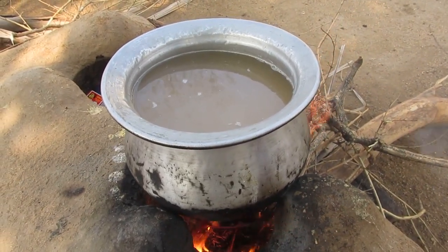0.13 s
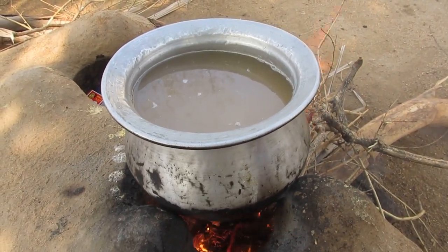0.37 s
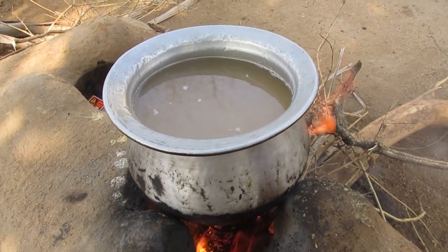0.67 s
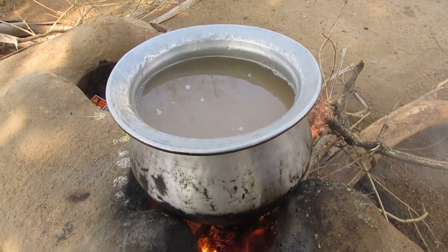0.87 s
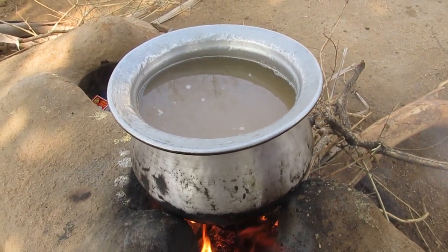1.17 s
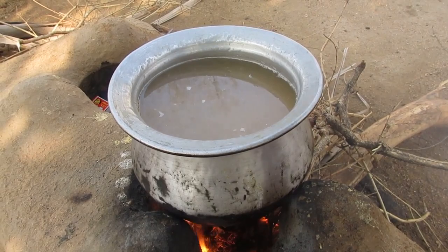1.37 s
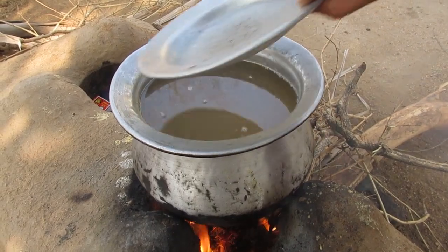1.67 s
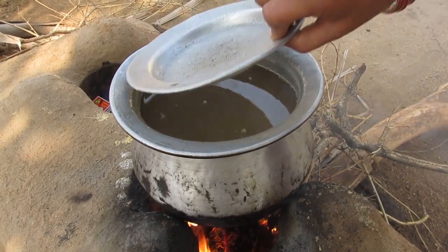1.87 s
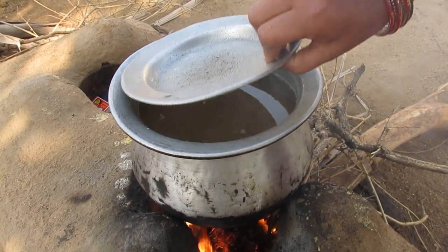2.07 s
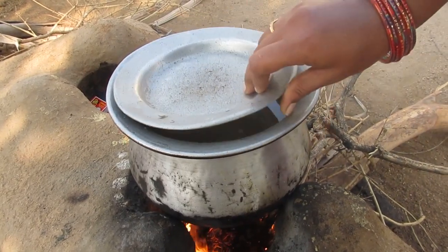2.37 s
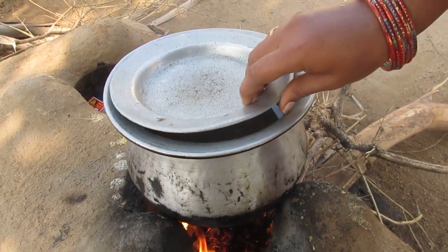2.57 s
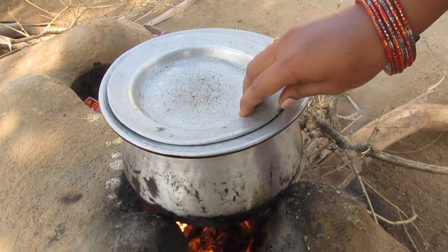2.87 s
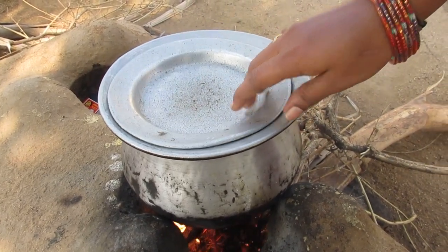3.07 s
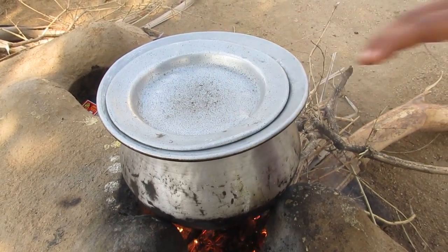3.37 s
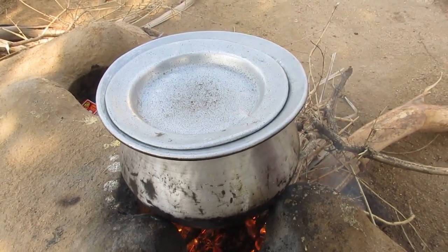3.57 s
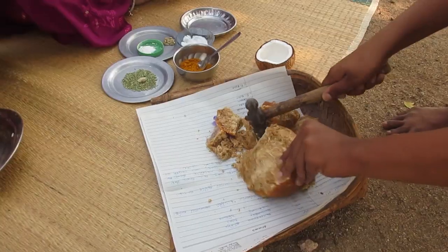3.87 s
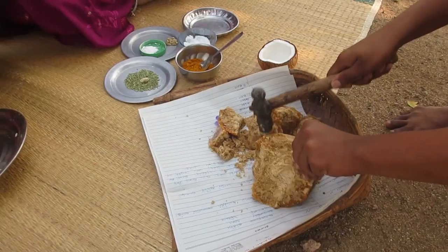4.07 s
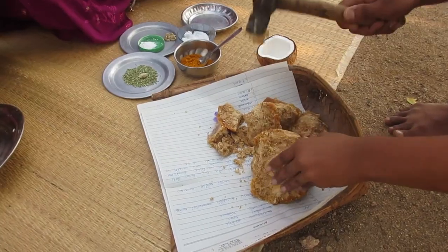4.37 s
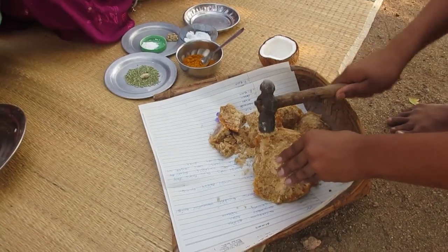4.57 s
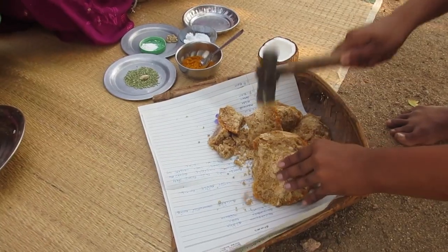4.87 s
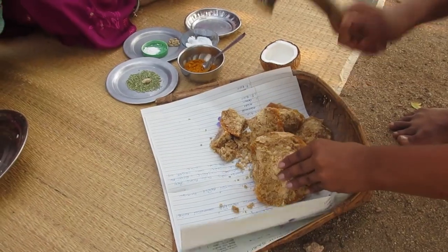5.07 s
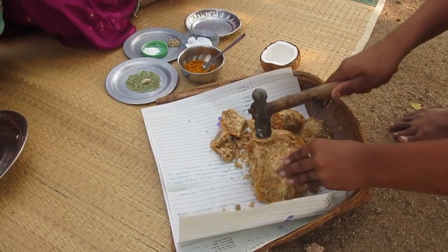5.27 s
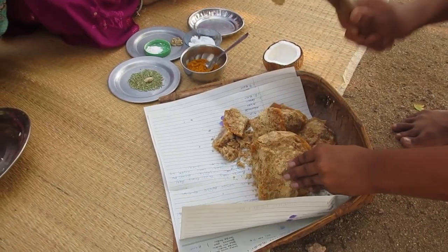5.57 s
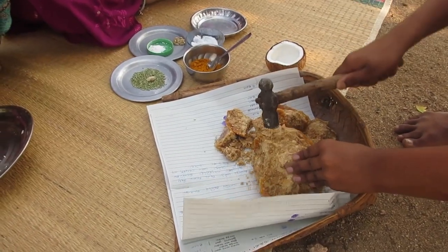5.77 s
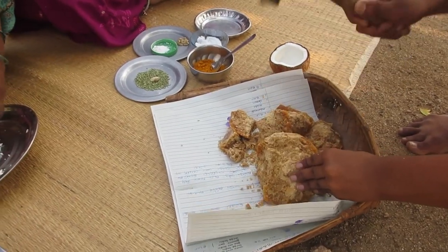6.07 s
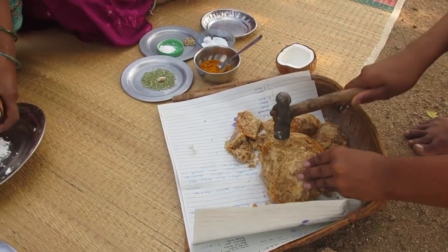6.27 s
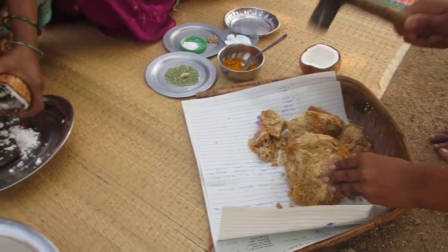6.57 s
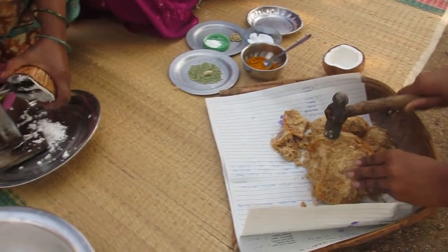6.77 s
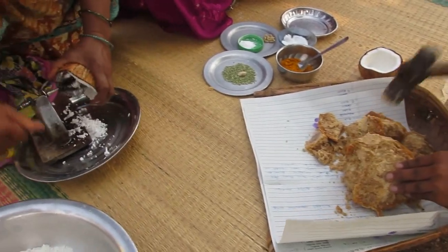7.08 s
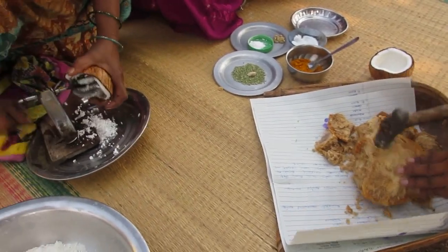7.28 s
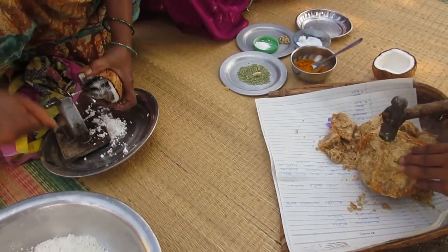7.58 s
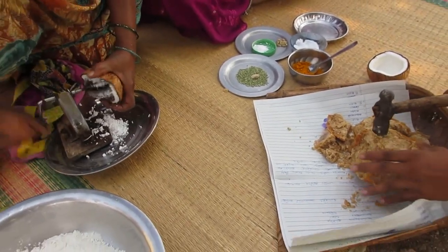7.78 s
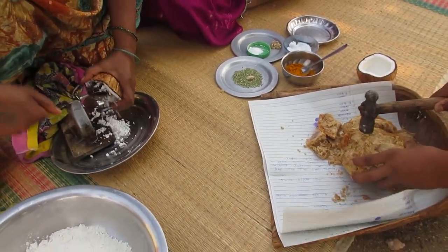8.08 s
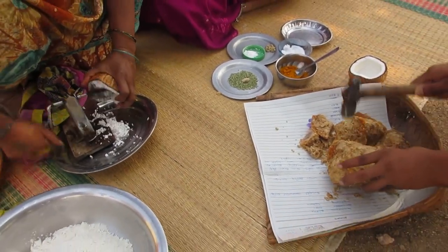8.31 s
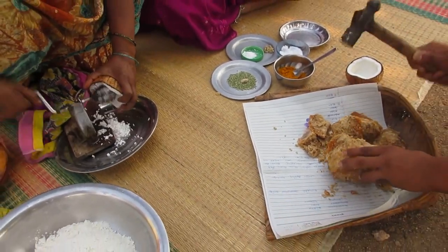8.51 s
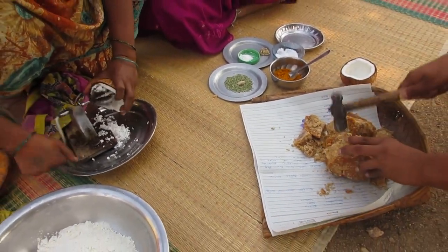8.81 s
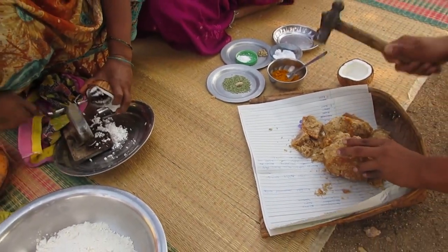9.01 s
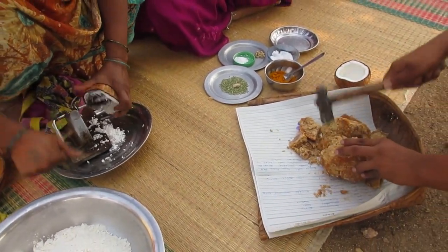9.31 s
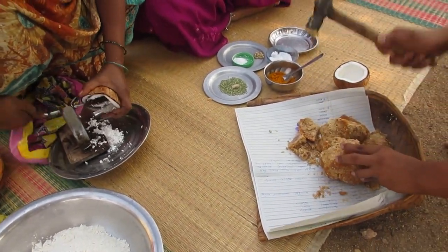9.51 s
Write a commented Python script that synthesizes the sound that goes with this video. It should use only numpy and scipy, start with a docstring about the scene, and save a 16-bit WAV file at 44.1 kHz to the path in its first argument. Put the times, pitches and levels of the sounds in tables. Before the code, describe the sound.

Outdoor wood fire snaps, bangles jingle and a metal lid clanks onto a pot; then hammer blows crunch a hard block beside rapid coconut grating.

```python
"""Fireside pot and jaggery breaking

At a crackling wood fire outdoors a bird whistles, bangles jingle, a twig knocks and a metal lid is
slid onto a pot. After a short silence a hammer breaks a block of jaggery on paper in a winnowing
basket, while coconut halves are grated on a toothed blade and the shell knocks on the steel.
Hits are decaying noise bursts and damped modes; rubbing and grating are grain noise under
stroke envelopes; the whistles are gliding sines; air and flame are coloured noise.
"""
import sys
import numpy as np
from scipy import signal
from scipy.fft import rfft, irfft, next_fast_len
from scipy.io import wavfile
from scipy.ndimage import uniform_filter1d

SR = 44100
rng = np.random.default_rng(int(sys.argv[2]) if len(sys.argv) > 2 else 0)


def output_pcm(signal):
    """Save a mono or channel-first signal as 16-bit PCM at the path in sys.argv[1].

    Samples are clipped to [-1, 1] before scaling.
    """
    pcm = np.clip(np.atleast_2d(signal).T, -1, 1) * 32767
    wavfile.write(sys.argv[1], SR, np.round(pcm).astype(np.int16))


N = 425565
T = np.arange(N) / SR
AGE = np.arange(SR // 3) / SR  # s since a hit

# All event and mode levels are relative: each source adds its own gains.
# Every *_COLOUR table is a spectrum: freq_hz, rel_db. Every *_MODES table: freq_hz, rel_db, t60_s.

# Hammer blows: start_s, knock_hz, knock_db, basket_thump_db, crunch_db, bright_crack_db
BLOWS = [(4.5771, 760, 1, -2, -2.5, -12.5), (5.1912, 863, 11, -4.5, -4, -18), (5.7086, 556, 5, -2, -2, -20),
         (6.2389, 1050, 9, -4, -6, -27), (6.7715, 1215, 9, -10, -3.5, -21),
         (7.3108, 1090, 1.5, -6.5, -9, -17), (8.6532, 593, -20, -4, -8, -16),
         (9.151, 520, -10, -4, -8, -13), (9.6440, 590, 1.5, -5.5, -6.5, -15.5)]
# Winnowing basket: freq_hz, rel_db, t60_s
BASKET_MODES = [(162, -25, 0.062), (206.6, 0, 0.037), (262.6, -6.5, 0.034), (378, -6, 0.0274),
                (481, -3, 0.024)]
# Crushed block: freq_hz, rel_db
CRUNCH_COLOUR = [(100, -23), (350, -1), (520, 2), (1300, -4), (1800, -4.5), (2600, -6), (4000, -8),
                 (6000, -18.5), (10000, -24), (15000, -35)]
CRACK_COLOUR = [(1500, -19), (3600, 10.5), (8000, -2.0), (15000, -10.5)]
SETTLE_COLOUR = [(90, 7.0), (250, 4), (800, -4.5), (3000, -6.5), (12000, -29)]

# Runs of even grating strokes: first_s, last_s, nominal_rate_per_s, first_db, last_db, drag_db (re strokes)
RUNS = [(6.53, 6.74, 14, -47, -34, -4), (6.811, 6.939, 16, -43, -41, -15),
        (7.049, 7.272, 18, -42, -38.5, -11), (7.34, 7.584, 16, -36, -35.5, -24),
        (7.654, 8.015, 17, -31.5, -35, -6.5), (8.154, 8.467, 20, -32, -34.5, -7),
        (8.504, 8.822, 16, -33.5, -31, -7), (8.883, 9.144, 23, -38.5, -35, -4.5),
        (9.259, 9.527, 15, -34, -32, -8)]
# Torn fibres: freq_hz, rel_db
GRATE_COLOUR = [(120, -18.5), (230, -1.5), (380, -16.5), (500, -6), (700, -17.5), (1050, -2), (1700, -9.5),
                (2450, 3), (3300, -3.5), (4300, -5), (5200, -15), (6300, -12), (7700, -19.5), (10700, -15),
                (15500, -37.5)]
TEETH_COLOUR = [(600, -27), (2000, 8), (6000, 4.5), (11000, 4), (15000, -15)]
STROKE_SCATTER_DB, STROKE_SLIP_S = 1.86, 0.004  # the hand is never quite even

# Shell knocks on the blade: start_s, low_clack_db, bright_clink_db
CLACKS = [(6.675, -28, -23.5), (7.098, -26, -40), (7.214, -37.5, -36.5), (7.416, -49, -28.5),
          (7.52, -25, -33.5), (7.638, -22.5, -33.5), (7.704, -20, -31.5), (7.811, -30, -26),
          (7.901, -23.5, -33), (7.949, -21, -24.5), (8.048, -6, -25.5), (8.316, -21.5, -32.5),
          (8.457, -19.5, -31), (8.483, -18.5, -19.5), (8.6, -14.5, -39), (8.609, -9, -20),
          (9.169, -34, -21.5), (9.413, -24, -16), (9.443, -18, -25.5), (9.599, -35, -19), (9.606, -26, -13)]
# Clack noise: freq_hz, rel_db
CLACK_COLOUR = [(120, -12), (400, 1), (650, 7.5), (1400, 7), (2600, 0), (4500, 3.5), (8000, -15.5),
                (15000, -20.5)]
STEEL_TICK_COLOUR = [(1500, -8), (4000, 0), (11000, -2), (15000, -8)]
# Hollow shell: freq_hz, rel_db, t60_s
SHELL_MODES = [(618, -10, 0.1), (887, 1.5, 0.11), (1085, -6, 0.051), (1550, 4, 0.049), (2070, 1.5, 0.081),
               (2580, 5.5, 0.063), (3560, 5, 0.038), (4300, -3, 0.039)]
# Steel blade: freq_hz, rel_db, t60_s
BLADE_MODES = [(3070, -35, 0.11), (6400, -42, .04), (5930, 12, 0.035), (6700, 10, 0.046),
               (8600, 3.5, 0.051), (10600, 4, 0.062), (12500, -1.5, .03)]

# Block pushed over the paper: start_s, length_s, grit_db, hiss_db
PUSHES = [(3.885, .015, -33.5, -60), (3.905, .05, -28, -40.5), (3.957, .01, -22.5, -41.5),
          (3.986, .036, -31, -33), (4.116, .008, -32, -38), (4.623, .54, -49.5, -65)]
# Gritty drag: freq_hz, rel_db
SHIFT_COLOUR = [(47, -39), (80, -17), (300, -8), (382, -15), (581, -2.5), (663, -13), (845, -8.5),
                (1790, -8), (3310, -6), (11100, -24), (15500, -28.5)]
HISS_COLOUR = [(2000, -10.5), (5000, 3.5), (9000, 7), (15000, -1.0)]
# Largest crumbs falling: start_s, level_db
CRUMBS = [(4.12, -22), (4.147, -26.5), (4.479, -31), (4.819, -16), (4.882, -26.5), (4.941, -26.5),
          (5.114, -22.5), (5.495, -32.5), (5.627, -32.5), (5.74, -23.5), (5.862, -31), (6.057, -28),
          (6.269, -31.5)]
# Crumbs and paper rustle: freq_hz, rel_db
CRUMB_COLOUR = [(150, -4), (700, 0.5), (2300, 5.5), (4500, 0.5), (9000, -6.5), (15000, -19.5)]
PUSH_ATTACK_S, PUSH_RELEASE_S = 0.0072, 0.019
RUSTLE_DB, RUSTLE_FALL_DB_PER_S = -49, 29.5
SMALL_CRUMB_DB, CRUMB_FLIGHT_MAX_S = -32, 0.47

# Lid meets rim: start_s, first_edge_db, opposite_edge_db, opposite_chatter_s (time to drop 20 dB)
LID_HITS = [(1.999, -12, -33, 0.018), (2.19, -23.5, -27, .09), (2.263, -20.5, -38, .02),
            (2.298, -21.5, -37, .02), (2.345, -9, -9, 0.014), (2.662, -10, -14.5, 0.039),
            (2.733, -8, -18, 0.032), (2.825, -9.5, -19, 0.017), (2.833, 4, -1, 0.066),
            (3.114, -4.5, -6.5, 0.068)]
# Lid and pot: freq_hz, rel_db, t60_s
LID_MODES = [(620, -7.5, 0.093), (694.3, -3.5, .12), (768, 6.5, 0.029), (851, -7, 0.06),
             (982, -33.5, 0.097), (1204, -4, 0.12), (1308, -5.5, 0.063), (1464, -20.5, 0.096),
             (1520, -4.5, 0.11), (1656, -3.5, 0.12), (1750, -14, .07), (2060, -13, 0.13),
             (2036, -13.5, 0.15), (2230, -0.5, 0.099), (2420, -8.5, 0.12), (2450, -7, 0.072),
             (2576, -11.5, 0.14), (3250, -12, .06), (3540, -19, .05), (3930, -17.5, 0.085),
             (4210, -6, 0.042), (4570, -18.5, .065)]
LID_TICK_COLOUR = [(200, -24.0), (700, 17.5), (2200, -4.0), (5000, -7), (10000, -18.0), (15000, -42)]
ROCK_S, FIRST_CHATTER_S = 0.016, 0.027  # opposite edge delay; first edge time to drop 20 dB
# Lid slides: middle_s, sigma_s, level_db
SLIDES = [(1.278, 0.073, -45.5), (1.873, 0.096, -47.5), (2.187, 0.042, -37), (2.479, 0.076, -36),
          (2.797, 0.049, -39)]
# Metal rub: freq_hz, rel_db
RUB_COLOUR = [(500, -20), (700, -28), (1400, 5), (2600, -2), (3500, -1.5), (4400, -0.5), (6000, -5.5),
              (10000, -8.5), (15000, -26)]
# Pot thuds on its stones: start_s, level_db
JOLTS = [(2.834, -10), (3.345, -40.5), (3.643, -27.5)]
JOLT_COLOUR = [(45, -10.5), (110, -2.5), (260, 5), (1000, -9), (5000, -11.5), (14000, -20.0)]

# Bangles touch: start_s, level_db
JINGLES = [(0.969, -35.5), (1.055, -38), (1.298, -7), (1.343, -16), (1.357, -20.5), (1.383, -23.5),
           (1.398, -24.5), (2.016, -29)]
# Glass bangle: freq_hz, rel_db, t60_s
BANGLE_MODES = [(6830, -9, 0.047), (7600, -2, 0.039), (7930, 0, 0.063), (8360, 3, 0.044), (8560, -5, 0.076),
                (8510, -13, 0.12), (8870, -3, 0.0506), (9630, -20, 0.124), (10700, -17.5, 0.13),
                (11300, -13, 0.12)]
REBOUND_MIN_S, REBOUND_LOSS_DB = 0.0068, 5  # bangles spring apart and touch again

# Twig knock and scuff by the fire: start_s, level_db
TWIG_KNOCKS = [(1.198, -34), (1.21, -25.5), (1.261, -43.5)]
TWIG_COLOUR = [(300, 6), (900, -26.0), (1450, -2.0), (2400, -5.0), (3500, -18.5), (9000, -26.5)]

# Snaps of burning wood, except 1.987 s, which is the lid touching the rim: start_s, level_db
SNAPS_AND_RIM_TOUCH = [(0.0214, -20), (0.265, -24.5), (0.4058, -25.5), (1.0994, -19.5), (1.2097, -14),
                       (1.5314, -26), (1.6211, -19), (1.987, -22.5), (2.054, -24.5), (2.387, -21),
                       (2.6356, -18.5), (3.052, -35), (3.6763, -33)]
SNAP_COLOUR = [(900, -6.5), (2200, 2), (5000, -2.0), (10000, -6.5), (15000, -17.0)]
FAINT_SNAP_DB = -37
# Flame flap: time_s, level_db
FLAME = [(.5, -72), (.57, -47), (.595, -45), (.615, -36), (.64, -46), (.68, -48)]
# Flame noise: freq_hz, rel_db
FLAME_COLOUR = [(50, -27), (150, -2), (260, 3.5), (450, -2.5), (800, -15), (4000, -18.5), (12000, -39.5)]

# Bird whistles: start_s, length_s, start_hz, middle_hz, end_hz, level_db
WHISTLES = [(0.048, 0.12, 3620, 3670, 3250, -45), (0.145, 0.073, 3200, 3050, 3150, -48),
            (.29, 0.11, 3050, 2890, 2580, -49.5), (0.472, 0.061, 3050, 2810, 2660, -46),
            (0.641, 0.11, 4100, 4628, 4940, -52), (0.84, 0.15, 3050, 3040, 2700, -55)]

# Open air at the stove: time_s, level_db
STOVE_AIR = [(0, -50), (2.0, -50), (2.8, -48.5), (2.92, -58), (3.69, -52)]
# Open air at the mat: time_s, level_db
MAT_AIR = [(3.89, -51), (5.15, -51.5), (5.3, -59.5), (7.0, -60.5), (9.65, -50.5)]
# Outdoor rush: freq_hz, rel_db
AIR_COLOUR = [(71, -29.5), (120, -3.5), (387, -5), (546, -7), (655, -9), (835, -10), (1250, -7.5),
              (1500, -6.5), (1830, -12), (2800, -14.5), (3500, -15.5), (8870, -23), (15000, -37)]
# Low rumble: freq_hz, rel_db
RUMBLE_COLOUR = [(25, -5), (45, 2), (80, 2.5), (150, -0.5), (280, -2.5), (500, -25.5), (2000, -52.5)]
STOVE_RUMBLE_DB, MAT_RUMBLE_DB = -3, -1.5  # re rush

# Silence between stove and mat: start_s, end_s
PAUSE = (3.69, 3.89)
TOP_HZ = 15300


def hammer(knock_db=0, thump_db=-4, crunch_db=0, settle_db=-26,
           knock_t60_s=0.0074, crunch_t60_s=0.024, rise_s=0.001, give_s=0.0019):
    """The head knocks and crushes the block, which thumps the basket; loose pieces settle after it."""
    out = np.zeros(N)
    contact = 1 - np.exp(-(AGE / rise_s) ** 2)
    for s, hz, knock, thump, crunch, crack in BLOWS:
        head = np.sin(2 * np.pi * hz * AGE) * fade(knock_t60_s)
        add(out, s, amp(knock + knock_db) * head * np.sqrt(contact))
        basket = sum(amp(db + rng.normal()) * np.sin(2 * np.pi * f * AGE) * fade(t60)
                     for f, db, t60 in BASKET_MODES)
        add(out, s + give_s, amp(thump + thump_db) * basket * contact)  # the block gives way first
        add(out, s, amp(crunch + crunch_db) * contact * burst(CRUNCH_COLOUR, crunch_t60_s))
        add(out, s, amp(crack) * contact * burst(CRACK_COLOUR, t60_s=0.036))
        add(out, s, amp(thump + settle_db) * contact * burst(SETTLE_COLOUR, t60_s=0.21))
    return out


def grater(rasp_db=-0.5, teeth_db=-10, sigma_s=0.017, squeak_db=-4, squeak_hz=2850):
    """Each stroke tears fibres over the toothed blade: a coloured rasp, tooth catches and a squeak."""
    rows, drag = strokes()
    middle_s = AGE.mean()
    bell = np.exp(-((AGE - middle_s) / sigma_s) ** 2 / 2)
    power = drag ** 2
    for s, db in rows:
        add(power, s - middle_s, (amp(db) * bell) ** 2)
    pressure = np.sqrt(power)
    fibres = patchy(grains(rate_per_s=1400, spread_db=5, t60_s=0.006), depth_db=3.3, frames=4)
    catches = patchy(grains(rate_per_s=90, spread_db=6, t60_s=0.01), depth_db=5, frames=4)
    rasp = amp(rasp_db) * colour(fibres, GRATE_COLOUR)
    teeth = amp(teeth_db) * colour(catches, TEETH_COLOUR)
    out = pressure * (rasp + teeth)
    for s, db in rows:
        # the shell meets the blade at a new spot each time
        pitch_hz = squeak_hz * np.exp(rng.normal(0, 0.06))
        tone = squeak(pitch_hz, glide_per_s=rng.normal(0, 2.5), width_hz=200)
        add(out, s - middle_s, amp(db + squeak_db) * bell * tone)
    return out


def strokes():
    """Near-even strokes (middle_s, level_db) and the drag of the flesh that stays on the blade."""
    rows, drag = [], np.zeros(N)
    for first, last, rate, first_db, last_db, drag_db in RUNS:
        for s in np.linspace(first, last, round((last - first) * rate) + 1):
            slip = STROKE_SLIP_S * rng.uniform(-1, 1)
            db = np.interp(s, [first, last], [first_db, last_db])
            rows.append((s + slip, db + STROKE_SCATTER_DB * rng.normal()))
        run_db = np.interp(T, [first, last], [first_db, last_db])
        hold = held(first - 0.025, last - first + 0.04, attack_s=0.025, release_s=0.054)
        drag += amp(drag_db + run_db) * hold
    return rows, drag


def squeak(hz, glide_per_s, width_hz):
    """Narrow, rough band of sticking and slipping fibres whose pitch slides during a stroke."""
    noise = rng.standard_normal(len(AGE)) + 1j * rng.standard_normal(len(AGE))
    slow = signal.sosfilt(signal.butter(2, width_hz / 2, fs=SR, output="sos"), noise)
    pitch_hz = hz * np.exp(glide_per_s * (AGE - AGE.mean()))
    return unit(np.real(slow * np.exp(2j * np.pi * np.cumsum(pitch_hz) / SR)))


def clacks(clack_db=-10, shell_db=-6, clink_db=-3, tick_db=1):
    """The hard shell slips onto the steel: a hollow clack and a short bright clink."""
    out = np.zeros(N)
    for s, low_db, bright_db in CLACKS:
        clack = amp(clack_db) * burst(CLACK_COLOUR, t60_s=0.072)
        shell = amp(shell_db) * ring(SHELL_MODES, detune=0.0353)
        tick = amp(tick_db) * burst(STEEL_TICK_COLOUR, t60_s=0.014)
        clink = amp(clink_db) * ring(BLADE_MODES, detune=0.021)  # the blade's edge pings
        add(out, s, amp(low_db) * (clack + shell) + amp(bright_db) * (clink + tick))
    return out


def paper(shift_db=-1, crumb_db=-4, hiss_db=0):
    """The gritty block drags over the paper and sheds crumbs; the paper relaxes after each blow."""
    grit = patchy(grains(rate_per_s=2500, spread_db=3, t60_s=0.005), depth_db=3, frames=6)
    pushes = np.array([held(s, length, PUSH_ATTACK_S, PUSH_RELEASE_S) for s, length, _, _ in PUSHES])
    drag, hiss = amp(np.transpose(PUSHES)[2:]) @ pushes
    rustle = sum((T > s) * amp(RUSTLE_DB - RUSTLE_FALL_DB_PER_S * np.abs(T - s)) for s, *_ in BLOWS)
    out = amp(shift_db) * drag * colour(grit, SHIFT_COLOUR)
    out += amp(hiss_db) * hiss * colour(rng.standard_normal(N), HISS_COLOUR)
    out += rustle * colour(grains(rate_per_s=650, spread_db=9, t60_s=0.025), CRUMB_COLOUR)
    crumbs = np.zeros(N)
    for s, db in CRUMBS + small_crumbs():
        add(crumbs, s, amp(db + crumb_db) * burst(CRUMB_COLOUR, t60_s=0.025))
    return out + np.std(crumbs) * patchy(crumbs, depth_db=-0.5, frames=8)


def small_crumbs(count=3):
    """Each blow throws a few small crumbs that land at random delays: start_s, level_db."""
    return [(s + CRUMB_FLIGHT_MAX_S * rng.random(), SMALL_CRUMB_DB + 3 * rng.normal())
            for s, *_ in BLOWS for _ in range(count)]


def lid(ring_db=-8, tick_db=-11, bounce_gap_s=0.006, bounce_db=-4):
    """Each contact chatters in fading bounces that click and ring lid and pot."""
    out = np.zeros(N)
    edges = [(s, db, FIRST_CHATTER_S) for s, db, _, _ in LID_HITS]
    edges += [(s + ROCK_S, db, chatter) for s, _, db, chatter in LID_HITS]
    for s, db, chatter in edges:
        delays = np.cumsum(bounce_gap_s * rng.uniform(0.44, 1.5, size=12))
        contacts = [(0.00069, 0.0057)]  # delay_s, gain_db
        contacts += [(delay, bounce_db - 20 * delay / chatter) for delay in delays]
        for delay, gain_db in contacts:
            tick = amp(tick_db) * burst(LID_TICK_COLOUR, t60_s=0.031)
            metal = amp(ring_db) * ring(LID_MODES, detune=0.011)
            add(out, s + delay, amp(db + gain_db) * (metal + tick))
    return highpass(highpass(out, hz=400), hz=400)


def rims(rub_db=-4, ring_db=-4):
    """Metal rubs on metal with wandering overtones and keeps the lid faintly ringing."""
    slips = patchy(grains(rate_per_s=1500, spread_db=3, t60_s=0.005), depth_db=4, frames=10)
    response = ring(LID_MODES, spread_db=1) + ring(LID_MODES, detune=0.03, spread_db=1)
    ringing = patchy(signal.fftconvolve(slips, response)[:N], depth_db=4, frames=8)
    speed = sum(amp(db) * swell(s, sigma) for s, sigma, db in SLIDES)
    return speed * (amp(rub_db) * colour(slips, RUB_COLOUR) + amp(ring_db) * ringing)


def jolt():
    """Dull noise thuds as the lid lands and the pot settles."""
    out = np.zeros(N)
    for s, db in JOLTS:
        add(out, s, amp(db) * burst(JOLT_COLOUR, t60_s=0.021))
    return out


def bangles(gain_db=-5, rattle_db=-8, attack_s=0.0012, count=3):
    """Glass bangles ping and rebound, each ping with a weaker rattle at slightly different pitches."""
    out = np.zeros(N)
    onset = 1 - np.exp(-(AGE / attack_s) ** 2)
    touches = [(s + k * REBOUND_MIN_S * rng.uniform(1.0, 1.3), db - k * REBOUND_LOSS_DB)
               for s, db in JINGLES for k in range(count)]
    for s, db in touches:
        ping = ring(BANGLE_MODES, detune=0.006, spread_db=6.5)
        rattle = ring(BANGLE_MODES, detune=0.03, spread_db=7)
        add(out, s - attack_s, amp(db + gain_db) * onset * ping)
        add(out, s + rng.uniform(0.002, 0.012), amp(db + gain_db + rattle_db) * onset * rattle)
    return out


def twig():
    """A twig knocks and scuffs: short noise bursts without bass."""
    out = np.zeros(N)
    for s, db in TWIG_KNOCKS:
        add(out, s, amp(db) * burst(TWIG_COLOUR, t60_s=0.056))
    return highpass(highpass(out, hz=400), hz=400)


def fire(snap_db=-6, flame_db=0):
    """Dry wood snaps and one touch of lid on rim as short noise bursts; a flame flap as a noise swell."""
    out = np.zeros(N)
    for s, db in SNAPS_AND_RIM_TOUCH + faint_snaps():
        add(out, s, amp(db + snap_db) * burst(SNAP_COLOUR, t60_s=0.011))
    flame = level(FLAME) * colour(rng.standard_normal(N), FLAME_COLOUR)
    return highpass(out, hz=667) + amp(flame_db) * flame


def faint_snaps(count=11):
    """Small snaps at random moments before the pause: start_s, level_db."""
    return [(PAUSE[0] * rng.random(), FAINT_SNAP_DB + 3 * rng.normal()) for _ in range(count)]


def bird(gain_db=-1, waver=0.02):
    """Distant slurred whistles: gliding sines with a random pitch waver (rms fraction)."""
    out = np.zeros(N)
    for s, length, start, middle, end, db in WHISTLES:
        u = np.linspace(0, 1, int(length * SR))
        hz = np.interp(u, [0, 0.5, 1], [start, middle, end])
        wander = unit(uniform_filter1d(rng.standard_normal(len(u)), size=140))
        hz = hz * (1 + waver * wander)
        add(out, s, amp(db + gain_db) * np.sin(np.pi * u) * np.sin(2 * np.pi * np.cumsum(hz) / SR))
    return out


def air():
    """Soft outdoor rush over a low rumble, balanced differently in the two places."""
    stove, mat = level(STOVE_AIR), level(MAT_AIR)
    rush = (stove + mat) * colour(rng.standard_normal(N), AIR_COLOUR)
    rumble_gain = amp(STOVE_RUMBLE_DB) * stove + amp(MAT_RUMBLE_DB) * mat
    return rush + rumble_gain * colour(rng.standard_normal(N), RUMBLE_COLOUR)


def amp(db):
    """Decibels to gain."""
    return 10 ** (np.asarray(db) / 20)


def unit(x):
    """Scale to rms 1."""
    return x / np.sqrt(np.mean(x ** 2) + 1e-20)


def fade(t60_s):
    """Exponential decay after a hit, -60 dB at t60_s."""
    return np.exp(-np.log(1000) * AGE / t60_s)


def level(rows):
    """Gain per sample from (time_s, level_db) rows, silent outside them."""
    s, db = np.transpose(rows)
    return amp(np.interp(T, s, db)) * (T >= s[0]) * (T <= s[-1])


def swell(s, sigma_s):
    """Gaussian rise and fall centred on time s."""
    return np.exp(-np.minimum(((T - s) / sigma_s) ** 2 / 2, 50))


def held(s, length_s, attack_s, release_s):
    """Linear rise from time s, then exponential decay from s + length_s."""
    rise = np.clip((T - s) / attack_s, 0, 1)
    return rise * np.exp(-np.clip((T - s - length_s) / release_s, 0, 50))


def colour(x, points):
    """Shape x by (freq_hz, rel_db) points, to rms 1; extra roll-off below the first point."""
    f, db = np.transpose(points)
    m = next_fast_len(len(x) + SR // 5)
    hz = np.fft.rfftfreq(m, 1 / SR)
    gain = amp(np.interp(np.log(hz + 1), np.log(f), db)) * np.minimum(1, hz / f[0]) ** 2
    return unit(irfft(rfft(x, m) * gain, m)[:len(x)])


def highpass(x, hz):
    """Small objects radiate little bass."""
    return signal.sosfilt(signal.butter(2, hz, "highpass", fs=SR, output="sos"), x)


def burst(points, t60_s):
    """A dying puff of coloured noise."""
    return colour(rng.standard_normal(len(AGE)), points) * fade(t60_s)


def ring(modes, detune=0, spread_db=3):
    """Damped modes, struck at new strengths each time; the grip shifts their pitch a little."""
    hz, db, t60 = np.transpose(modes)
    hz = hz * (1 + detune * rng.standard_normal(len(hz)))
    gain = amp(db + spread_db * rng.standard_normal(len(hz))) * rng.choice([-1, 1], len(hz))
    partials = np.sin(2 * np.pi * hz[:, None] * AGE) * fade(t60[:, None])
    return gain / np.linalg.norm(gain) @ partials


def grains(rate_per_s, spread_db, t60_s):
    """Tiny fractures of uneven size, each a brief spit of noise."""
    sizes = (rng.random(N) < rate_per_s / SR) * amp(spread_db * np.clip(rng.standard_normal(N), -2, 2))
    power = np.abs(signal.fftconvolve(sizes ** 2, fade(t60_s) ** 2)[:N])
    return unit(np.sqrt(power) * rng.standard_normal(N))


def patchy(x, depth_db, frames):
    """Resonances that shift as the contact point moves: random time-frequency gains, smoothed."""
    z = signal.stft(x, nperseg=512)[2]
    field = uniform_filter1d(rng.standard_normal(z.shape), size=4, axis=0)
    field = uniform_filter1d(field, size=frames, axis=1)
    return unit(signal.istft(z * amp(depth_db * unit(field)), nperseg=512)[1][:N])


def add(track, s, sound):
    """Mix a sound into the track at time s."""
    part = track[max(0, round(s * SR)):][:len(sound)]
    part += sound[:len(part)]


def scene():
    """First the stove, then the work on the mat, over the open air."""
    mat = highpass(hammer() + grater() + clacks() + paper(), hz=111)
    stove = lid() + rims() + jolt() + bangles() + twig() + fire() + bird()
    return (mat + stove + air())[None]


def record(dry):
    """Mute the pause, clip at full scale, cut everything from TOP_HZ up."""
    live = (T < PAUSE[0]) | (T > PAUSE[1])
    clipped = np.clip(dry * live, -1, 1)
    m = next_fast_len(N + SR // 5)
    passband = np.fft.rfftfreq(m, 1 / SR) < TOP_HZ
    return irfft(rfft(clipped, m) * passband, m)[:, :N]


dry = scene()
out = record(dry)
output_pcm(out)
```